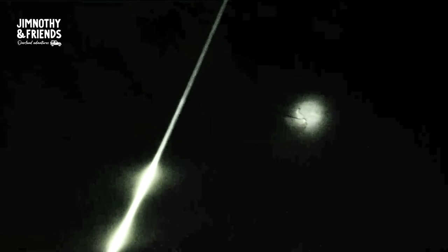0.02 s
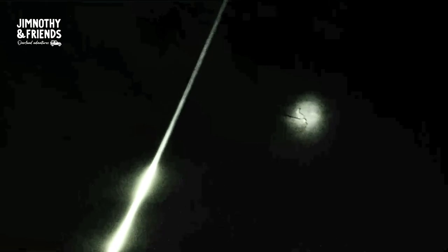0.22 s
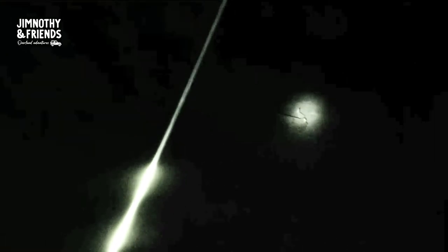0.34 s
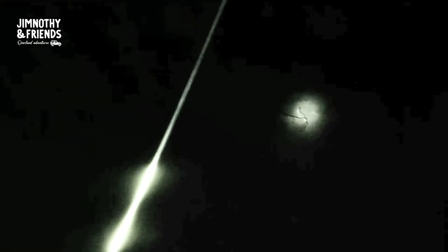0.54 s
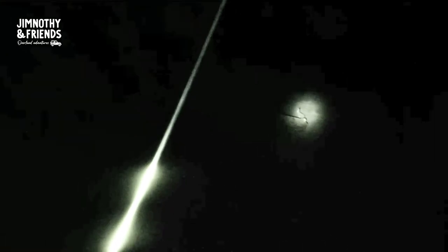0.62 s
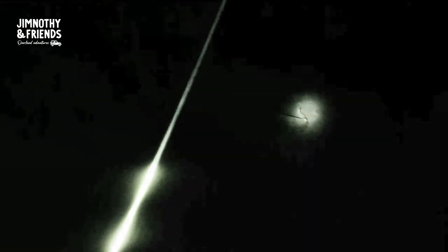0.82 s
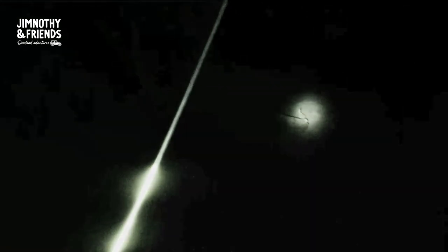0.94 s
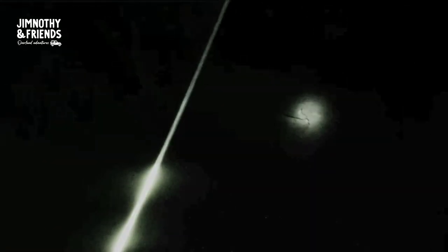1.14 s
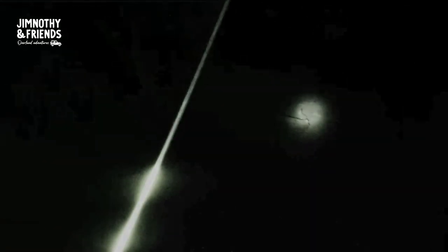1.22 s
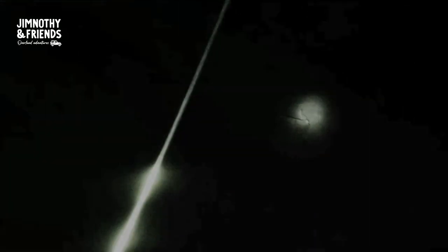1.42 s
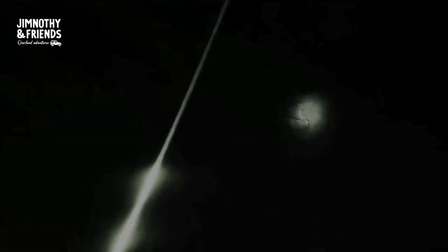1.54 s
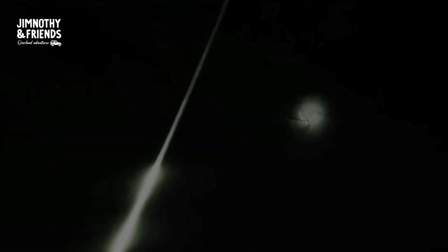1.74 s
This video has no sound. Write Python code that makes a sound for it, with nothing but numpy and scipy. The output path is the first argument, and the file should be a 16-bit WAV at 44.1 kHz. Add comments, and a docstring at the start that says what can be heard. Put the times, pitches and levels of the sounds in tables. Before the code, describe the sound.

Barking geckos at night, one close caller giving six sharp clicking chirps, neighbours answering faintly

```python
"""Barking geckos at night in open country, in mono, over a faint far chorus, light wind rumble and hiss.
Distant geckos bark from the start to the end. A neighbour joins at about 0.2 s with seven barks, and just
after it a close caller begins six louder ones, the last at 1.3 s.
A bark is a short, slowing burst of throat pulses that ring in the mouth; one bounce comes off the ground
beside the caller, and nearby ground and far scrub scatter the sound back as two random tails."""
import sys
import numpy as np
from scipy import signal
from scipy.fft import rfft, irfft, next_fast_len
from scipy.io import wavfile
from scipy.ndimage import map_coordinates

SR = 44100
rng = np.random.default_rng(int(sys.argv[2]) if len(sys.argv) > 2 else 0)


def gain_from_db(level_db):
    """Convert decibel levels to linear amplitude factors (20 dB per decade)."""
    decades = np.asarray(level_db, float) / 20
    return 10 ** decades


def pcm_store(signal):
    """Save signal as 16-bit PCM."""
    levels = np.round(np.clip(np.atleast_2d(signal), -1, 1) * 32767)
    wavfile.write(sys.argv[1], SR, levels.astype(np.int16).T)


N = 77175  # 1.75 s

# reflection beside the caller, for every gecko but the near one: (delay_s, level_db)
FAR_BOUNCE = (0.000695, -12)


def points(table, hz):
    """Reads a (hz, value) table at any frequency, along a log axis."""
    f, v = np.transpose(table)
    return np.interp(np.log(hz + 1), np.log(f + 1), v)


def level_curve(rows):
    """Turns (time_s, level_db) rows into one dB value per sample."""
    return np.interp(np.arange(N) / SR, *np.transpose(rows))


def wobble(rate):
    """A smooth random curve with rate knots a second."""
    knots = rng.standard_normal(int(N * rate / SR) + 4)
    return map_coordinates(knots, [np.arange(N) * rate / SR])


def noise(colour):
    """Random noise shaped by a (hz, db) colour and brought to rms 1."""
    size = next_fast_len(N + 8192)
    spectrum = rfft(rng.standard_normal(size))
    shape = gain_from_db(points(colour, np.fft.rfftfreq(size, 1 / SR)))
    x = irfft(spectrum * shape, size)[:N]
    return x / x.std()


def air_hiss():
    """Steady broadband hiss whose level drifts slowly."""
    # hiss colour: hz, density_db (dB per Hz, relative)
    hiss_colour = [(150, -25), (250, -3), (740, -7), (1170, -7), (1250, -5), (1460, -8), (11900, -19.5),
                   (15300, -21), (16400, -33)]
    return gain_from_db(-64 + 1.5 * wobble(2.6)) * noise(hiss_colour)


def wind_rumble():
    """Light wind: low noise that swells and sinks with the gusts."""
    # gusts: time_s, level_db (before the lift below)
    gusts = [(0.0, -69.5), (0.13, -64.5), (0.154, -69), (0.204, -70), (0.238, -65), (0.262, -72),
             (0.428, -71), (0.466, -80), (0.496, -70), (1.3, -72), (1.334, -67), (1.36, -69),
             (1.686, -74.5), (1.75, -68)]
    # rumble colour: hz, level_db (relative)
    rumble_colour = [(20, -37), (40, -9), (80, -0.5), (150, -5.5), (260, -7.5), (500, -34), (1000, -77)]
    lift_db = 1.54
    return gain_from_db(level_curve(gusts) + lift_db + 1.3 * wobble(19)) * noise(rumble_colour)


def far_chorus():
    """Callers too far off to tell apart blur into one wavering band of noise."""
    # chorus swell: time_s, level_db (before the lift below)
    swell = [(0.0, -67.5), (0.238, -71), (0.38, -59), (1.262, -68), (1.48, -74), (1.75, -69)]
    # chorus colour: hz, level_db (relative)
    chorus_colour = [(900, -37), (2000, -13), (3300, -10.5), (3900, -6), (4300, 0), (4800, -8.5),
                     (6000, -19), (8500, -47)]
    lift_db = 2.55
    waver_db = 4.7 * wobble(29.68) + 4.5 * wobble(45.03)
    return gain_from_db(level_curve(swell) + lift_db + waver_db) * noise(chorus_colour)


def scatter(x, decay, delay_s):
    """Scattered return: a fresh random tail that builds up, then dies at its own speed at each frequency."""
    hz, t, z = signal.stft(rng.standard_normal(SR // 2), SR, nperseg=128)
    t60_s = points(decay, hz)[:, None]
    tail = signal.istft(z * gain_from_db(-60 * t / t60_s), SR, nperseg=128)[1]
    tail = tail * (1 - np.exp(-np.arange(len(tail)) / SR / delay_s))
    return signal.fftconvolve(x, tail / np.linalg.norm(tail))


def pulse_times(start_s, gap_s, slowing, count):
    """The throat slows: each gap is longer than the one before, and the last gaps drag most."""
    last_gap_drag, jitter_s = 4.6, .00002  # drag in extra steps of slowing
    k = np.arange(count)
    drag = last_gap_drag * np.exp(np.minimum(k + 2 - count, 0))
    gaps = gap_s * (1 + slowing * (k + drag))
    return start_s + np.cumsum(gaps) - gaps + jitter_s * rng.standard_normal(count)


def rasp(hz, count):
    """A puff of air trails each pulse in the treble: decaying noise, as a factor on the pulse spectrum."""
    rasp_db, fade_s, above_hz = -2.5, .0016, 7700  # fade_s: time to fall to 1/e
    t = np.arange(4096) / SR
    puff = rfft(rng.standard_normal((count, len(t))) * np.exp(-t / fade_s))
    puff = puff / np.sqrt(fade_s * SR / 2)
    return 1 + gain_from_db(rasp_db) * puff / (1 + (above_hz / (hz + 1)) ** 4)


def bark(start_s, gap_s, slowing, count, pulse, mouth, bounce):
    """One bark, summed as spectra: throat pulses, mouth resonances and a single ground bounce."""
    loudness_db = 14  # pulse size for a bark of 0 dB
    size_scatter_db, last_pulse_drop_db = 0.4, 6
    bass_lag_cycles = 0.29  # low partials of a pulse arrive late
    k, hz = np.arange(count), np.fft.rfftfreq(4096, 1 / SR)
    times = pulse_times(start_s, gap_s, slowing, count)
    size_db = size_scatter_db * rng.standard_normal(count) - last_pulse_drop_db * np.exp(k + 1 - count)
    table = np.array(pulse)
    fade_db = points(table[:, ::2], hz)
    colour_db = points(table[:, :2], hz) - k[:, None] * fade_db
    pulses = rasp(hz, count) * gain_from_db(colour_db + size_db[:, None])
    placed = pulses * np.exp(-2j * np.pi * hz * times[:, None])
    lag = np.exp(-2j * np.pi * bass_lag_cycles * np.log((hz + 1) / (hz + mouth[0][0])))
    burst = lag * np.sum(placed, axis=0)
    ring = 1 + sum(gain_from_db(db) * 1j * hz * w / (c ** 2 - hz ** 2 + 1j * hz * w) for c, w, db in mouth)
    delay_s, bounce_db = bounce
    echo = 1 + gain_from_db(bounce_db) * np.exp(-2j * np.pi * hz * delay_s)
    return -gain_from_db(loudness_db) * irfft(burst * ring * echo)


def gecko(calls, pulse, mouth, bounce, ground_db, scrub_db):
    """All barks at one distance, each with its own tails from ground and scrub set against the direct sound."""
    # decay off the nearby ground: hz, t60_s
    ground_decay = [(500, 0.14), (2000, 0.084), (4200, 0.064), (8000, 0.11), (15000, 0.019)]
    # decay off the far scrub: hz, t60_s
    scrub_decay = [(500, 0.26), (2000, 0.27), (4200, 0.29), (8000, 0.26), (15000, 0.14)]
    ground_build_s, scrub_build_s = 0.0013, 0.011  # time for each tail to build up
    out = np.zeros(N + SR)
    for start_s, db, gap_s, slowing, count in calls:
        at = int(start_s * SR) - 100  # a little room ahead of the first pulse
        direct = gain_from_db(db) * bark(start_s - at / SR, gap_s, slowing, int(count), pulse, mouth, bounce)
        ground = gain_from_db(ground_db) * scatter(direct, ground_decay, ground_build_s)
        scrub = gain_from_db(scrub_db) * scatter(direct, scrub_decay, scrub_build_s)
        for sound in (direct, ground, scrub):
            out[at:at + len(sound)] += sound
    return out[:N]


def distant_geckos():
    """Far callers: faint barks in which the ground scatter outweighs the direct sound."""
    # barks: start_s, level_db (relative), first_gap_s, slowing_share_per_pulse, pulses (whole part counts)
    distant_calls = [(.004, -42.5, 0.0024, 0.04, 7.2), (.076, -44, 0.002, 0.038, 5.1),
                     (.381, -43, 0.0025, 0.028, 6.7), (.591, -44, .002, 0.037, 9),
                     (.738, -35, .002, 0.019, 3), (.756, -42, .0021, 0.024, 4.1),
                     (.959, -43, 0.0023, 0.032, 6.8), (1.28, -41.5, .0019, .03, 10.5),
                     (1.385, -51, 0.0017, 0.032, 5.9), (1.4935, -47.5, 0.0013, 0.022, 5.2),
                     (1.535, -47, .0021, .03, 7.5), (1.595, -52, 0.0017, .03, 7.8),
                     (1.708, -36.5, .002, 0.0095, 10), (1.731, -42.5, 0.0013, 0.025, 11.6)]
    # one throat pulse: hz, level_db (relative), fade_db_per_pulse
    distant_pulse = [(794, -50, .1), (1950, -1.5, .3), (2670, -11.5, .4), (3500, -1, .6),
                     (4260, -2.5, 0.93), (5500, -12.5, 0.97), (7500, -45, .9)]
    mouth = [(4250, 600, 5.9)]  # centre_hz, width_hz, level_db
    return gecko(distant_calls, distant_pulse, mouth, FAR_BOUNCE, ground_db=1.5, scrub_db=-14)


def neighbour_gecko():
    """The answering neighbour: softer barks from farther off than the near caller."""
    # barks: start_s, level_db (relative), first_gap_s, slowing_share_per_pulse, pulses
    neighbour_calls = [(.1849, -28, .00153, .008, 8), (.3461, -26, .00151, .014, 9),
                       (.5150, -27, .00177, .006, 7), (.6803, -26, .00179, .004, 8),
                       (.8520, -28, .00180, .004, 7), (1.0305, -26, .00185, .004, 8),
                       (1.2281, -27, .00183, .004, 7)]
    # one throat pulse: hz, level_db (relative), fade_db_per_pulse
    neighbour_pulse = [(500, -57, .1), (1140, -13, 0.09), (2380, -21, .2), (3470, -5, 0.44),
                       (4370, -1, 0.63), (5400, -12.5, 1.5), (6500, -20.5, 2.1), (8500, -56, 1.5)]
    mouth = [(4250, 610, 12.9), (3360, 300, 3)]  # centre_hz, width_hz, level_db
    return gecko(neighbour_calls, neighbour_pulse, mouth, FAR_BOUNCE, ground_db=-12, scrub_db=-27)


def near_gecko():
    """The caller close to the microphone: loud, mostly direct barks with two strong mouth rings."""
    # barks: start_s, level_db (relative), first_gap_s, slowing_share_per_pulse, pulses
    near_calls = [(.20205, -4, .00195, .045, 9), (.40686, -4, .00197, .046, 10),
                  (.61142, -4, .00200, .042, 10), (.82759, -4, .00207, .042, 10),
                  (1.05652, -4.5, .00212, .040, 10), (1.30482, -5, .00229, .025, 10)]
    # one throat pulse: hz, level_db (relative), fade_db_per_pulse (negative grows); the top treble tires first
    near_pulse = [(226, -64.5, -1.5), (400, -24.5, -0.26), (618, -30.5, 0.5), (855, -21, -0.59),
                  (1744, -7.5, -0.35), (2700, -4.5, 0.36), (3230, -1.5, 0.77), (4320, -3, 1.5),
                  (5470, -8, 2.1), (6730, -12.5, 2), (7490, -22.5, 1.5), (10880, -35.5, 1.66),
                  (14900, -43, 2.2), (17000, -68, 4.5)]
    mouth = [(4147, 178, 15.9), (4472, 386, 9.97)]  # centre_hz, width_hz, level_db
    near_bounce = (0.0012086, -10.5)  # delay_s, level_db
    return gecko(near_calls, near_pulse, mouth, near_bounce, ground_db=-13.5, scrub_db=-23.5)


def scene():
    """Geckos at three distances over the night air, on one channel."""
    night = air_hiss() + wind_rumble() + far_chorus()
    geckos = distant_geckos() + neighbour_gecko() + near_gecko()
    return (night + geckos)[None]


def top_cut(x):
    """Nothing passes above the cut-off."""
    return signal.sosfilt(signal.butter(12, 16520, fs=SR, output="sos"), x)


def record(dry):
    """Takes the finished mix to its stored form, with no other change."""
    return top_cut(dry)


dry = scene()
out = record(dry)
pcm_store(out)
```